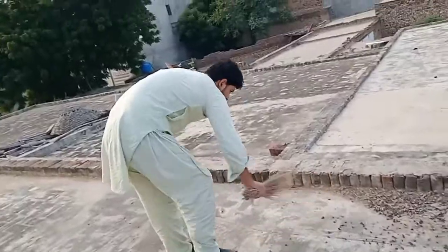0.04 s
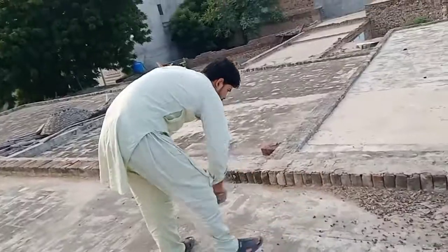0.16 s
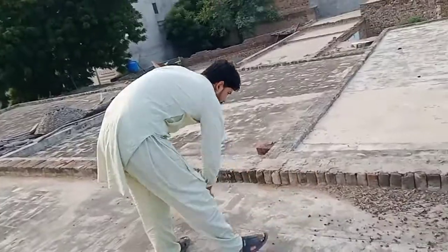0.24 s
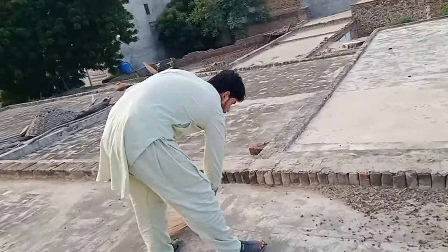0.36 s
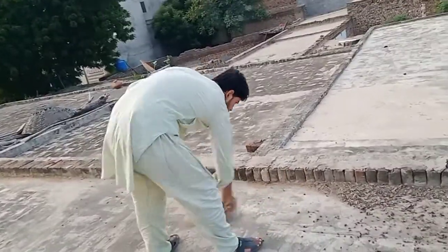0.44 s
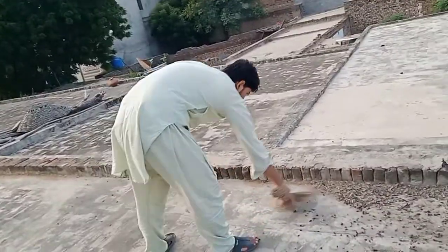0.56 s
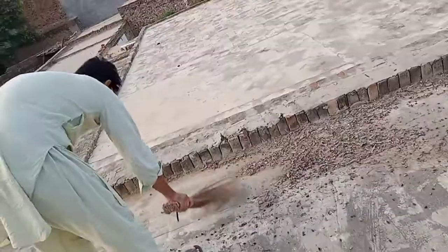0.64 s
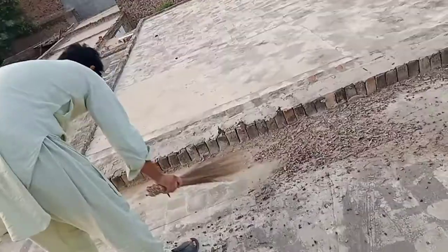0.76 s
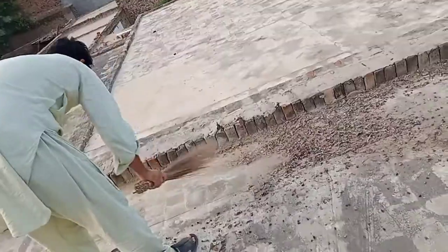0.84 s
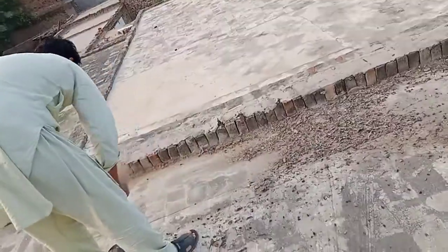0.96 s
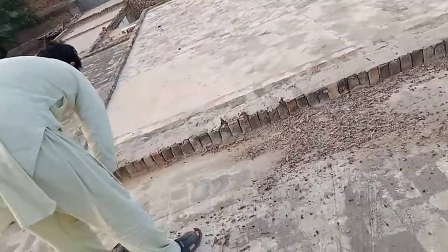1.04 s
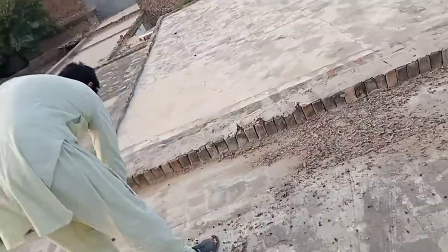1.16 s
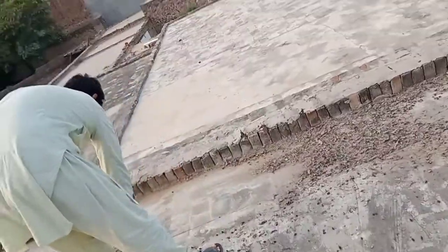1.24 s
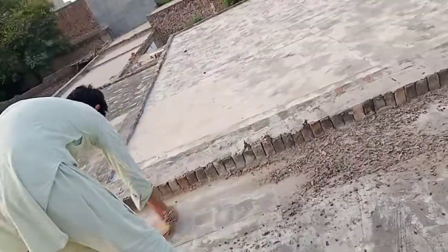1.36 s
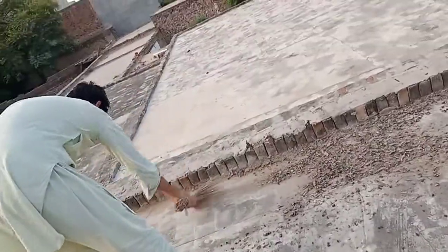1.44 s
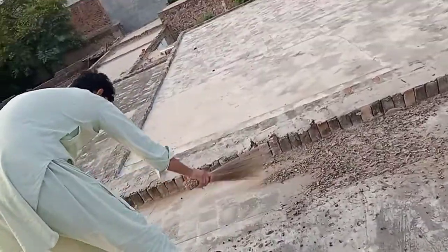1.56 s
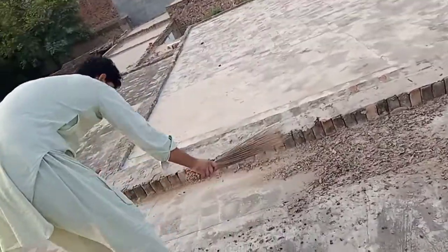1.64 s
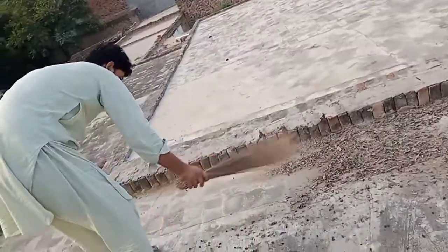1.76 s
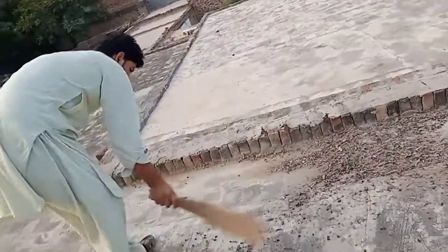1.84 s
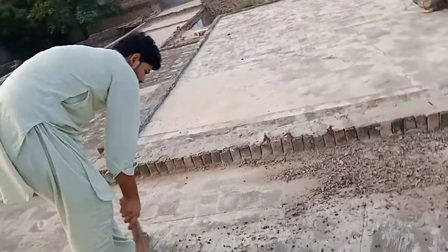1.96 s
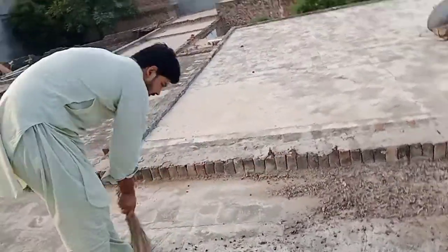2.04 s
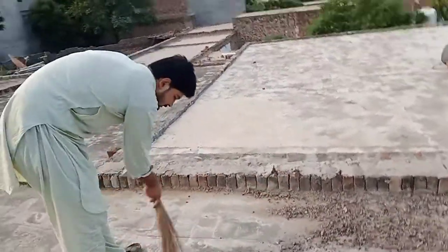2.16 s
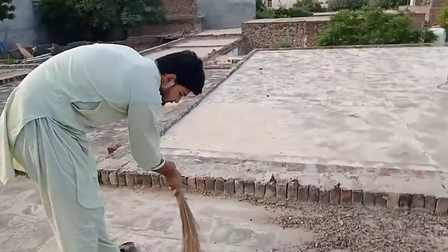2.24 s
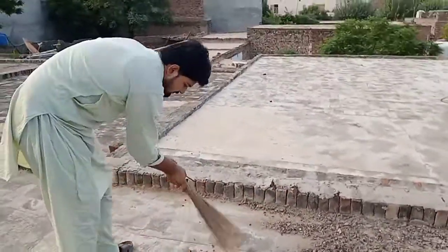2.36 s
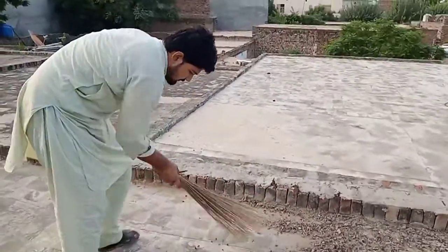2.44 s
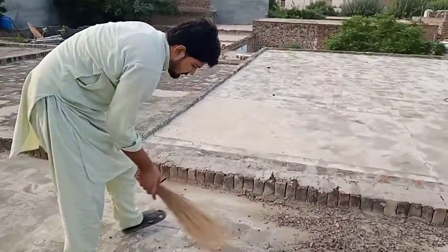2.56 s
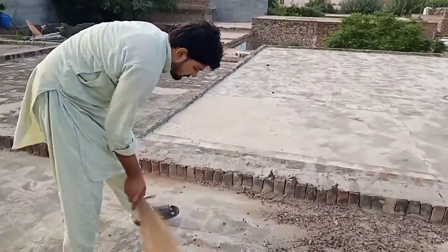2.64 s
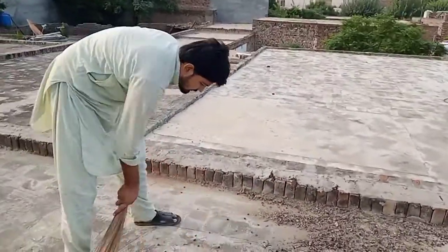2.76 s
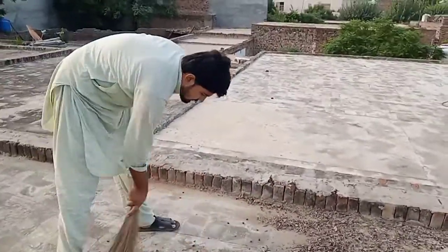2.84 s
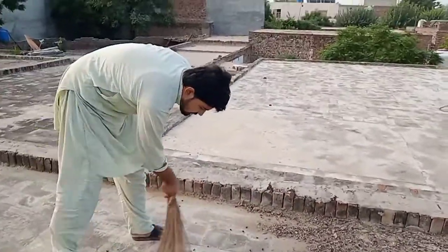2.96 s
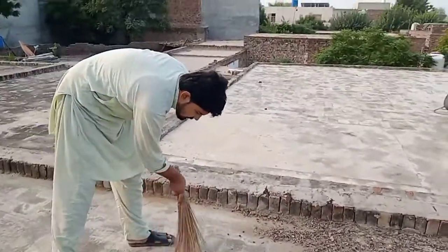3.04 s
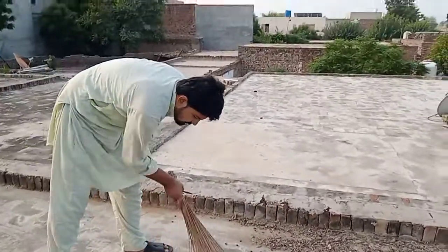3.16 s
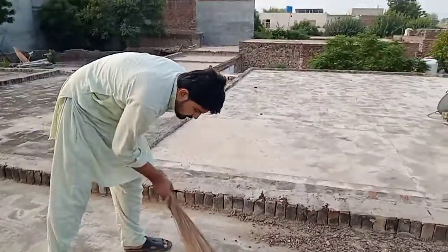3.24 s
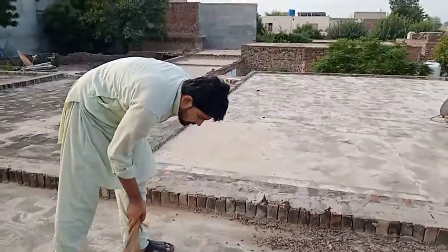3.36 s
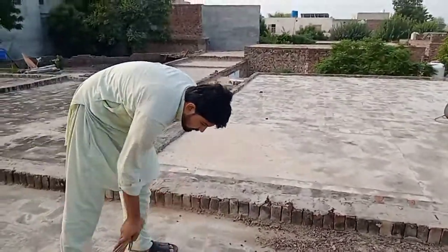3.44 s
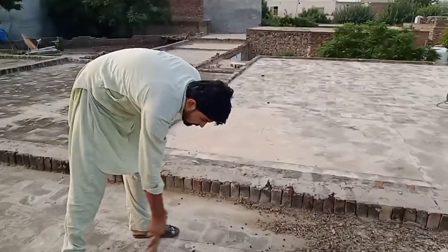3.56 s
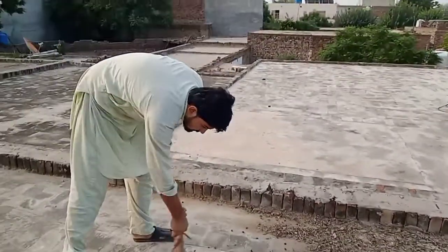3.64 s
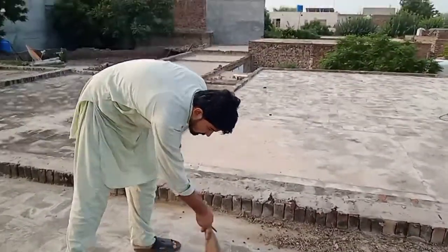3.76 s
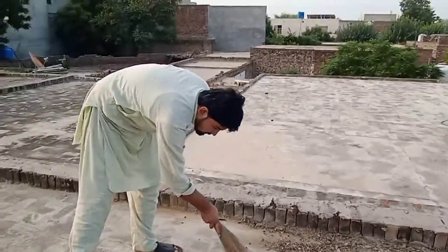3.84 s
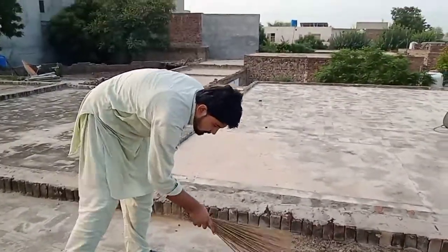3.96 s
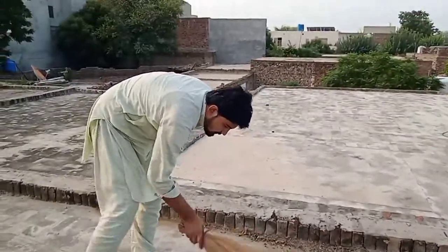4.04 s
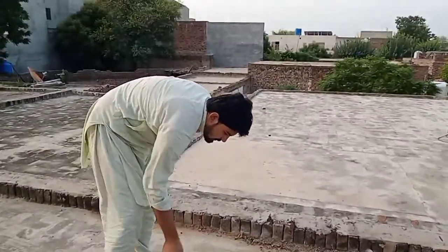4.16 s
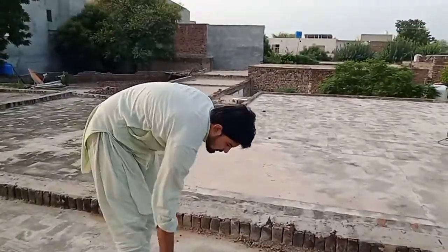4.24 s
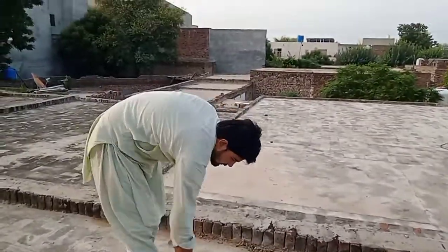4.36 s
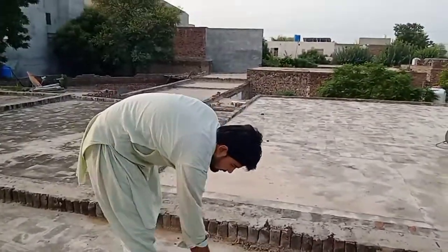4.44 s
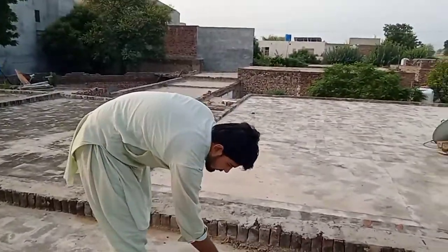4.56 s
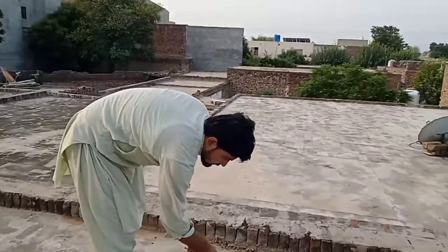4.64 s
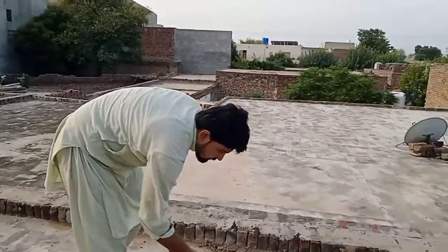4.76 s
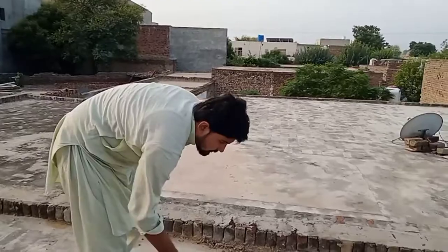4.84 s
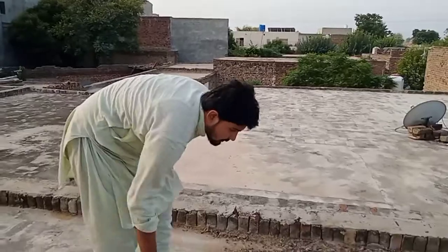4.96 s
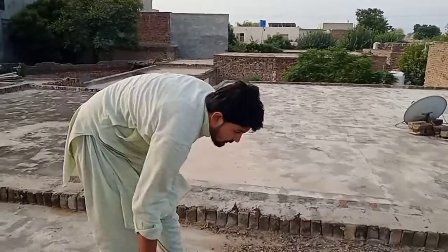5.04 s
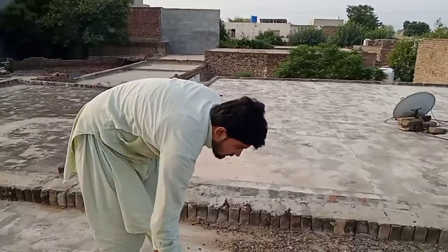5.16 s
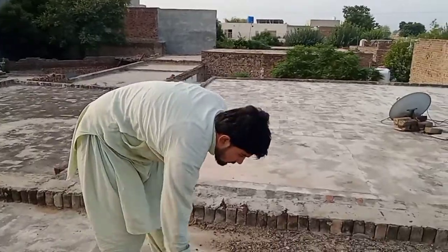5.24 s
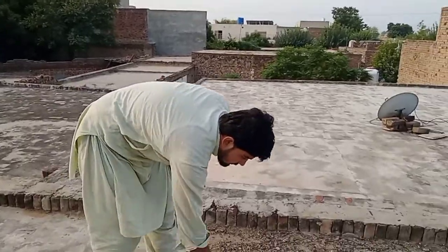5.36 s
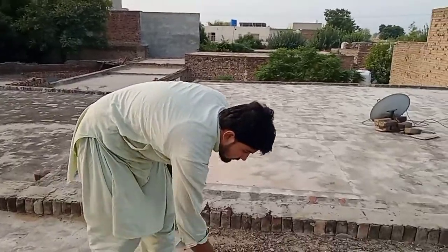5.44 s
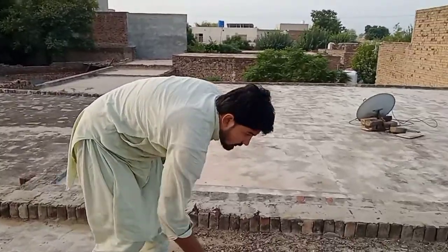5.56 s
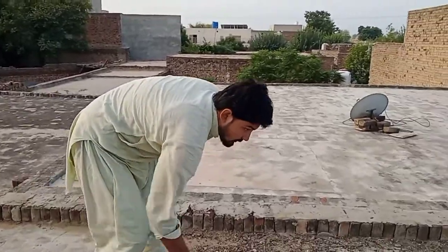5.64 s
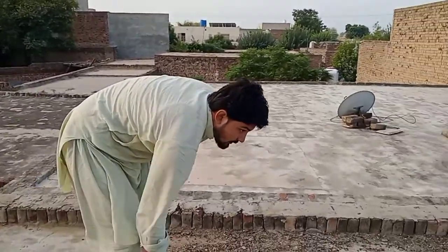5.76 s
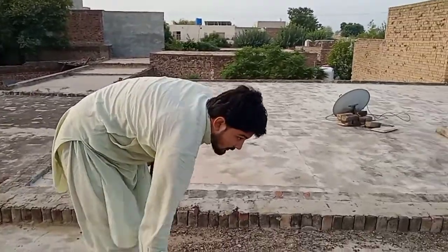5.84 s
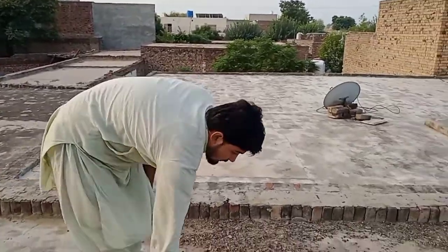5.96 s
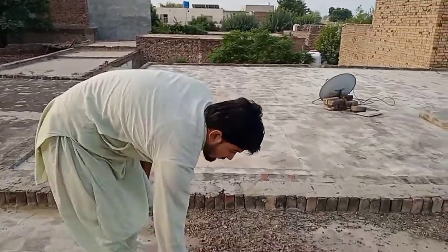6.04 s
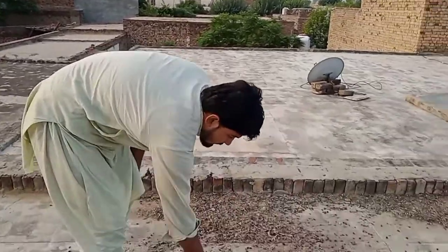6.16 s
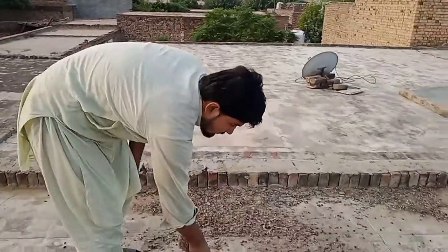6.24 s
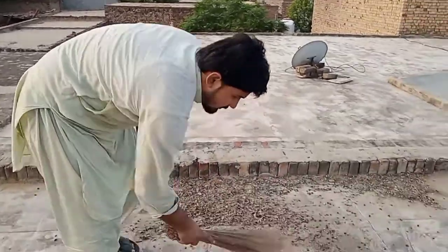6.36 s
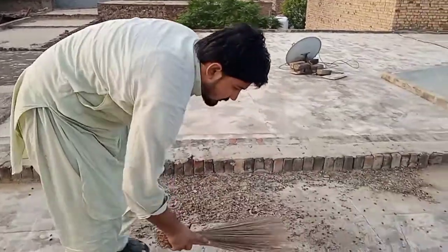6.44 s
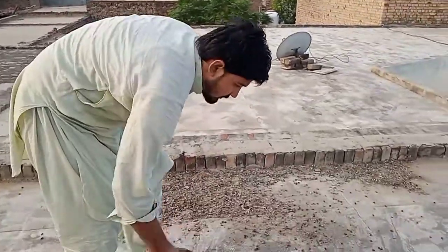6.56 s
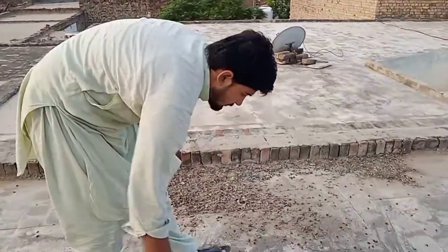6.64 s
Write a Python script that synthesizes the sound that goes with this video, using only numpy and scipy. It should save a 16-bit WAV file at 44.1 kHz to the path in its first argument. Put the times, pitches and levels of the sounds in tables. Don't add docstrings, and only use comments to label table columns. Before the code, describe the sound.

After a brief near-silence, dry scratchy broom strokes sweep leaves and dust, growing stronger, while distant birds call over a faint outdoor hum.

```python
import sys
import numpy as np
from scipy import signal
from scipy.fft import rfft, irfft, next_fast_len
from scipy.io import wavfile

SR = 44100
rng = np.random.default_rng(int(sys.argv[2]) if len(sys.argv) > 2 else 0)


def store_pcm(level_fs):
    pcm = np.round(np.clip(level_fs, -1, 1) * 32767).astype(np.int16)
    wavfile.write(sys.argv[1], SR, np.atleast_2d(pcm).T)


N = 295419

# (frequency [Hz], density [dB per Hz])
PORT_COLOUR = [(2000, -6), (2750, 5), (4200, -0.5), (5200, -6), (5850, 2), (6350, 1.5), (6650, -3),
               (7150, 2.5), (7600, -9), (8300, -15.5), (11000, -26), (13900, -27.5), (14600, -12.5),
               (15500, -7.5)]


def from_db(db):
    return 10 ** (np.asarray(db) / 20)


def rms_one(x):
    return x / np.sqrt(np.mean(x ** 2) + 1e-20)


def in_time(rows):
    s, *columns = np.transpose(rows)
    return [np.interp(np.arange(N) / SR, s, c) for c in columns]


def coloured(x, points):
    size = next_fast_len(N + 4096)
    hz = np.fft.rfftfreq(size, 1 / SR) + 1
    point_hz, point_db = np.array(points).T
    log_gain = np.interp(np.log(hz), np.log(point_hz), np.log(from_db(point_db)))
    cepstrum = irfft(log_gain, size)
    cepstrum[1:size // 2] *= 2
    cepstrum[size // 2 + 1:] = 0
    return irfft(rfft(x, size) * np.exp(rfft(cepstrum)), size)[:N]


def band(x, low_hz, high_hz, order=3):
    return signal.sosfilt(signal.butter(order, [low_hz, high_hz], "band", fs=SR, output="sos"), x)


def zones(x, edges_hz):
    size = next_fast_len(N)
    hz = np.fft.rfftfreq(size, 1 / SR) + 1
    spectrum = rfft(x, size)
    parts = []
    for low, high in edges_hz:
        skirts = np.sqrt((1 + (low / hz) ** 50) * (1 + (hz / high) ** 50))
        parts.append(rms_one(irfft(spectrum / skirts, size)[:N]))
    return parts


def drift(rate_hz):
    r = np.exp(-80 * np.pi * rate_hz / SR)
    draws = rng.standard_normal(N // 40 + 2002)
    slow = signal.lfilter([1], [1, -2 * r, r * r], draws)[2000:]
    return np.interp(np.arange(N) / 40, np.arange(len(slow)), rms_one(slow))


def ring(clicks, hz, t60):
    r, w = from_db(-60 / (t60 * SR)), 2 * np.pi * hz / SR
    return signal.lfilter([0, np.sin(w)], [1, -2 * r * np.cos(w), r * r], clicks + 1e-18)


def add(out, s, piece):
    i = round(s * SR)
    out[i:i + len(piece)] += piece[:N - i]


def glides(calls, gain_db, half_db, flutter_db, arch_db, rate, blur_hz=0, scoop=1):
    out = np.zeros(N)
    for s, length, first_hz, last_hz, db in calls:
        t = np.arange(0, length, 1 / SR)
        pitch = last_hz + (first_hz - last_hz) * (1 - t / length) ** scoop
        phase = np.pi * np.cumsum(pitch) / SR
        tone = np.sin(2 * phase) + from_db(half_db) * np.sin(phase) + from_db(-26) * np.sin(4 * phase)
        ends = np.clip(np.minimum(t, length - t) / 0.006, 0, 1)
        arch = (2 * (t / length) ** (scoop ** -0.3) - 1) ** 2
        add(out, s, ends * from_db(db + gain_db - arch_db * arch) * tone)
    blur = drift(blur_hz) if blur_hz else 1
    return out * from_db(flutter_db * drift(rate)) * blur


def layers():
    # (time [s], length [s], effort [dB], weight on bare brick [dB], dust raised [dB])
    pushes = [(0.68, 0.061, -38.5, -8, -6.5), (0.762, 0.067, -34.5, -8, -4.5),
              (1.111, 0.022, -43, 5.5, -16), (1.151, 0.03, -40, 1.5, -18), (1.3, 0.083, -39, -4, -7),
              (1.427, 0.035, -35, -6, -6.5), (1.505, 0.051, -40, -6.5, -6), (1.586, 0.072, -35, -7, -4),
              (2.102, 0.03, -44, 0, -5.5), (2.135, 0.11, -35, 2.5, -9), (2.207, 0.14, -34.5, -6, -6),
              (2.36, 0.093, -36.5, -7.5, -7), (2.479, 0.084, -38, -13.5, -10),
              (2.895, 0.14, -34.5, -8, -9.5), (3.074, 0.098, -29, -16.5, -10.5),
              (3.68, .25, -30, -13.5, -8.5), (4.522, .25, -28, -18, -12.5), (5.322, .22, -26.5, -18, -12.5),
              (5.615, 0.056, -27.5, -19.5, -15), (6.169, .2, -24, -21, -14.5),
              (6.381, 0.068, -30.5, -21.5, -14.5)]
    # (time [s], length [s], effort [dB], weight [dB], dust [dB])
    drags = [(2.66, 0.023, -53, -15, -15), (3.292, 0.043, -50, -36, -16.5), (3.579, 0.023, -50.5, -20, -14),
             (4.353, 0.055, -38.5, -26, -14), (4.88, 0.052, -54.5, -37, -14),
             (5.229, 0.018, -46, -20, -14.5), (6.055, 0.05, -39, -24, -14),
             (6.53, 0.061, -47.5, -14, -14.5)]
    # (offset [dB], share of weight [dB/dB], share of dust [dB/dB], gain once near [dB], swell [dB/s])
    answers = [
        (-1.22, 0.012, -0.0038, 0, 7),
        (1.46, 1, 0.042, -1.5, -6),
        (-4, -0.1, 1.32, 5.5, -3.7),
        (3.5, -0.23, 2.02, 16, -13),
        (-2.5, 0.39, -0.055, -17, 21.5),
        (-2.5, 0.004, 0.61, -3.5, -12.5),
        (-22, 0.74, 0.31, 13, 10),
        (-23, 0.92, -0.045, 17, 2.8),
    ]
    # (attack [dB/s], release [dB/s], settling starts below [dB], settling [dB/s], rest level [dB])
    motions = [(314, 263, 18.5, 45.5, -75), (420, 240, 20.5, 30, -73.5), (378, 251, 22, 76, -87),
               (385, 242, 16, 137, -77), (433, 203, 11, 56, -76), (345, 250, 15.5, 88, -82),
               (285, 356, 35, 51, -66.5), (377, 262, 16.5, 22, -69.5)]
    near_s = 4.94
    s, length, effort_db, brick_db, dust_db = np.array([*pushes, *drags]).T[:, :, None]
    length = np.maximum(length, 0.004)
    since = np.arange(0, N + 64, 64) / SR - s
    after = np.maximum(since - length, 0)
    quick = from_db(1.02 * np.maximum(brick_db + 6.5, 0))
    out = []
    for answer, motion in zip(answers, motions):
        off_db, brick, dust, near_db, swell = answer
        attack, release, drop_db, settle, rest_db = motion
        held = effort_db + off_db + brick * brick_db + dust * dust_db
        held = held + near_db * np.minimum(s / near_s, 1)
        held = held + swell * np.clip(since, 0, length) + attack * quick * np.minimum(since, 0)
        left = from_db(-drop_db - settle * after) * (length / 0.11) ** 0.1
        power = from_db(held) ** 2 * (from_db(-release * quick * after) ** 2 + left ** 2)
        level = 10 * np.log10(power.sum(0) + from_db(rest_db) ** 2)
        out.append(np.interp(np.arange(N) / 64, np.arange(since.shape[1]), level))
    return out


def town():
    # (frequency [Hz], density [dB per Hz])
    town_colour = [(25, -83), (45, -5.5), (90, -1), (260, -2), (370, -8.5), (620, -12), (1100, -8.5),
                   (1270, 11.5), (1420, 1.5), (2100, 9)]
    # (low edge [Hz], high edge [Hz])
    town_zones = [
        (35, 400),
        (400, 1050),
        (1050, 1550),
        (1550, 2330),
    ]
    # (time [s], level [dB])
    gusts = [(.64, -86), (.74, -74.5), (1.05, -67), (1.94, -67), (2.16, -56.5), (2.44, -70), (2.7, -61),
             (2.9, -67), (3.28, -68), (3.44, -58), (3.64, -61), (3.73, -71), (4.05, -69.5), (4.7, -70),
             (5.49, -68.5), (5.58, -66), (6.3, -71.5), (6.7, -69.5)]
    air = coloured(rng.standard_normal(N), town_colour)
    gust, = in_time(gusts)
    case, slab = layers()[-2:]
    above_calm = gust + 65.5
    levels = [gust, -67.5 + 0.73 * above_calm, case + 0.13 * above_calm, slab]
    return sum(from_db(level + 1.44 * drift(9.1) + 1.87 * drift(22)) * part
               for level, part in zip(levels, zones(air, town_zones)))


def coos():
    # (time [s], length [s], first pitch [Hz], last pitch [Hz], peak [dB])
    coo_calls = [(.71, 0.1, 1820, 1670, -67), (4.0, 0.23, 1950, 1900, -74.5),
                 (4.38, 0.068, 1840, 1810, -70.5), (.74, .07, 926, 915, -77), (1.05, 0.15, 876, 887, -70),
                 (5.13, 0.22, 812, 828, -75.5), (5.73, 0.09, 780, 803, -79), (6.55, 0.15, 640, 767, -76)]
    return glides(coo_calls, gain_db=11.0, half_db=-28, flutter_db=2.5, arch_db=4, rate=65)


def chatter():
    # (time [s], length [s], first pitch [Hz], last pitch [Hz], peak [dB])
    rough_calls = [(.97, .09, 3820, 3750, -61), (1.76, 0.24, 3940, 3950, -62.5),
                   (1.82, 0.11, 3040, 3360, -58.5), (2.04, 0.066, 3200, 3300, -56.5),
                   (3.3, .33, 3940, 4340, -56.5), (6.4, 0.12, 2030, 1920, -58),
                   (6.56, 0.19, 1966, 1707, -55.5)]
    return glides(rough_calls, gain_db=3.5, half_db=-15, flutter_db=1.0, arch_db=0, rate=17, blur_hz=260)


def whistles():
    # (time [s], length [s], first pitch [Hz], last pitch [Hz], peak [dB])
    whistle_calls = [(4.77, 0.39, 3540, 3520, -72), (5.13, 0.1, 3475, 3424, -65.5),
                     (5.75, 0.094, 3240, 3430, -65), (5.968, 0.11, 3310, 3404, -67)]
    return glides(whistle_calls, gain_db=13.5, half_db=-8, flutter_db=1.5, arch_db=8, rate=60, scoop=5)


def chirps():
    # (time [s], length [s], first pitch [Hz], last pitch [Hz], peak [dB])
    chirp_calls = [(.855, .035, 3870, 3470, -33), (1.222, .023, 2550, 3500, -32),
                   (1.245, .027, 3650, 3760, -35), (1.71, .045, 3200, 3900, -47),
                   (1.752, .025, 3900, 3750, -47), (2.022, .018, 3150, 3280, -43),
                   (2.675, .045, 4400, 3550, -47), (5.94, .028, 6200, 3500, -57)]
    return glides(chirp_calls, gain_db=-4.5, half_db=-30, flutter_db=2.5, arch_db=9, rate=82)


def chucks():
    # (time [s], peak [dB], pitch [Hz])
    chuck_calls = [(5.0324, -37, 2380), (5.2453, -37.5, 2460), (5.877, -38.5, 2400), (6.093, -36, 2330),
                   (6.534, -38.5, 2220)]
    out, t = np.zeros(N), np.arange(1800) / SR
    shape = 0.6 * np.exp(-t / 0.002) + np.exp(-((t - 0.011) / 0.008) ** 2)
    for s, db, hz in chuck_calls:
        rough = rng.standard_normal(len(t)) * shape
        note = band(rough, hz * 0.87, hz * 1.2) + 0.25 * band(rough, 3600, 4800, order=2)
        add(out, s, from_db(db - 1.5) * note / abs(note).max())
    return out


def knocks():
    # (time [s], crack peak [dB], case ring, relative [dB], thump, relative [dB])
    finger_hits = [(1.1107, -48.5, 0.5, -47), (1.29, -57, -15, -17), (2.6586, -44.5, 0.5, -26.5),
                   (2.7017, -51, -8, -5), (2.7829, -24, -9.5, -25.5), (4.4755, -46, 6.5, -45),
                   (4.4823, -45, 6.5, -47), (4.5064, -43, -7, -50)]
    crack, case, thump = np.zeros((3, N))
    for s, db, ring_db, thump_db in finger_hits:
        i = round((s + 0.0006) * SR)
        crack[i] = from_db(db + 29)
        case[i] = from_db(db + ring_db)
        thump[i] = from_db(db + thump_db)
    dull = signal.butter(6, 7400, fs=SR, output="sos")
    out = signal.sosfilt(dull, band(crack, 420, 5500, order=1))
    out = out + from_db(-22) * band(crack, 14200, 15700, order=2)
    out = out - from_db(9.5) * ring(case, 1247, 0.026)
    for gain_db, hz, t60 in [(22.5, 132, 0.011), (20, 300, 0.018), (24.5, 740, 0.0045)]:
        out = out - from_db(gain_db) * ring(thump, hz, t60)
    return out


def creaks():
    # (time [s], length [s], first pitch [Hz], last pitch [Hz], peak [dB])
    grip_creaks = [(3.38, .11, 1220, 1230, -58), (3.5, .13, 1150, 1190, -59), (3.5, .12, 820, 860, -63),
                   (3.41, .1, 420, 240, -64), (3.42, .2, 1700, 1680, -69)]
    return glides(grip_creaks, gain_db=2, half_db=-35, flutter_db=2.5, arch_db=9, rate=40, blur_hz=90)


def snaps():
    # (time [s], peak [dB], pitch [Hz])
    leaf_snaps = [(1.0839, -43, 2520), (1.112, -27, 6400), (1.1104, -23.5, 3600), (1.1176, -24, 3570),
                  (1.129, -45, 3450), (1.1304, -25, 2850), (1.1394, -21, 3740), (2.098, -28.5, 2980),
                  (2.1296, -40, 3520), (2.5938, -32.5, 3530), (2.6176, -40, 5400), (2.7274, -52, 3840),
                  (2.756, -42, 3990)]
    # (time [s], peak [dB], pitch [Hz])
    grit_falls = [(3.322, -54, 4520), (3.3692, -39, 6270), (3.376, -39, 6000), (3.393, -36, 5500),
                  (4.0084, -39, 6360), (4.145, -28.5, 5900), (4.159, -33, 7100), (4.171, -29.5, 5900),
                  (4.2877, -41, 6140), (4.93, -34, 6000), (4.9596, -38, 7100), (4.995, -35, 5400),
                  (5.0107, -32.5, 6050), (5.0552, -38, 5660), (5.1004, -34, 6000), (5.1135, -35, 6600),
                  (5.216, -30.5, 5900), (5.7887, -29, 5760), (5.8554, -33.5, 5200), (5.975, -42.5, 3480),
                  (6.0076, -52, 3450), (6.563, -26, 5900), (6.586, -28, 6060), (6.667, -17, 6020)]
    out, t = np.zeros(N), np.arange(500) / SR
    shape = np.minimum(t / 0.0004, 1) * np.exp(-t / 0.0013)
    for s, db, hz in [*leaf_snaps, *grit_falls]:
        burst = rng.standard_normal(len(t)) * shape
        body = band(burst, hz * 0.8, min(hz * 1.25, 7500), order=5)
        body = body + from_db(-22) * band(burst, 14300, 15600, order=2) + from_db(-38) * burst
        add(out, s, from_db(db + 1.5) * body / abs(body).max())
    return out


def broom():
    # (low edge [Hz], high edge [Hz])
    broom_zones = [
        (4600, 7900),
        (2330, 3650),
        (10300, 14000),
        (14000, 16500),
        (3650, 4600),
        (7900, 10300),
    ]
    # (time [s], level [dB])
    leaf_pile = [(.7, -3), (1.5, 2.5), (2.3, 5), (3.0, 5.5), (3.7, -4), (4.6, 1), (5.2, -6), (6.1, -1),
                 (6.6, -1)]
    levels = layers()[:-2]
    levels[4] = levels[4] + in_time(leaf_pile)[0]
    stroke = levels[0]
    per_s = np.clip(4000 * from_db(0.55 * (stroke + 35.0) + 2.0 * drift(55)), 150, 8000)
    sizes = from_db(3.9 * np.minimum(rng.exponential(1, N), 4)) * rng.choice([-1, 1], N)
    slips = sizes * (rng.random(N) < per_s / SR) / np.sqrt(per_s)
    rub = rms_one(slips) * from_db(-6.5 - 0.14 * (stroke + 30)) + rng.standard_normal(N)
    straws = np.zeros(N)
    for hz in np.geomspace(2300, 8200, 30) * from_db(rng.normal(0, 0.16, 30)):
        straws += from_db(16.5 * np.tanh(drift(8.1))) * rms_one(ring(rub, hz, 0.022)) * np.sqrt(hz)
    contact = coloured(rub + from_db(-9.0) * rms_one(straws), PORT_COLOUR)
    jostle = drift(58.0)
    return sum(from_db(level + 0.13 * jostle + 0.91 * drift(21)) * part
               for level, part in zip(levels, zones(contact, broom_zones)))


def scene():
    birds = coos() + chatter() + whistles() + chirps() + chucks()
    hand = knocks() + creaks()
    return np.tile(town() + birds + hand + snaps() + broom(), (2, 1))


def roll_off(x):
    return signal.sosfilt(signal.butter(12, 16630, fs=SR, output="sos"), x)


def record(dry):
    opening = np.clip((np.arange(N) / SR - 0.632) / 0.0034, 0, 1)
    idle = from_db(-106) * rms_one(coloured(rng.standard_normal(N), PORT_COLOUR))
    top_cut = signal.ellip(12, 0.5, 55, 15500, fs=SR, output="sos")
    bass_cut = signal.butter(3, 55, "high", fs=SR, output="sos")
    mix = signal.sosfilt(np.vstack([top_cut, bass_cut]), dry * opening + idle)
    return roll_off(mix)


dry = scene()
out = record(dry)
store_pcm(out)
```